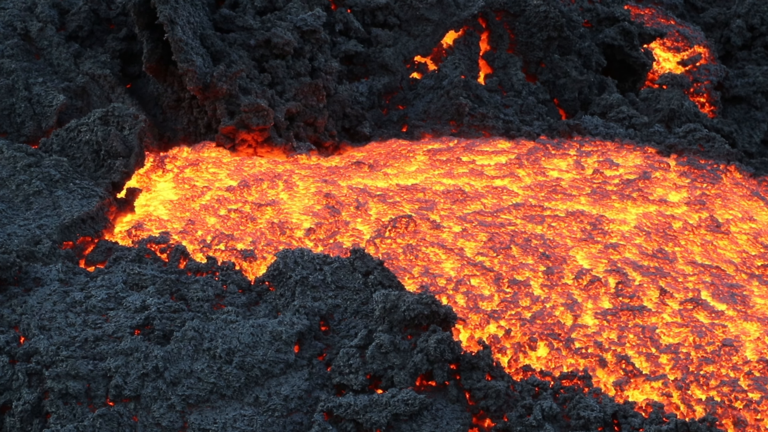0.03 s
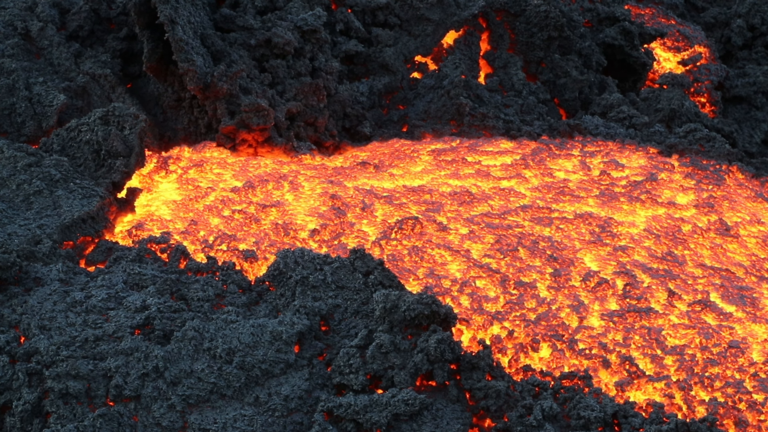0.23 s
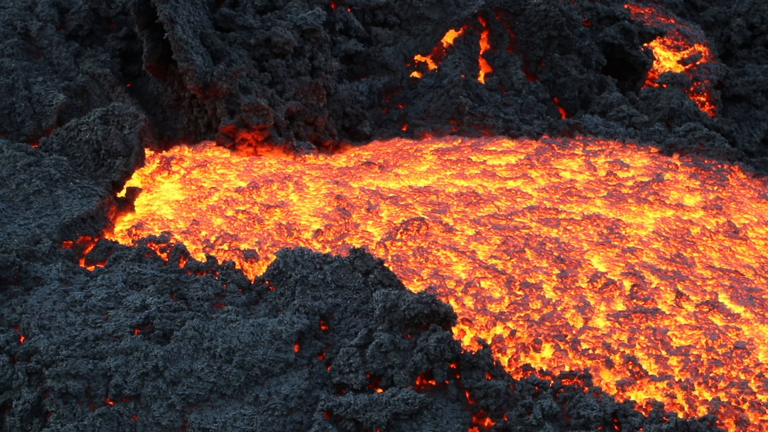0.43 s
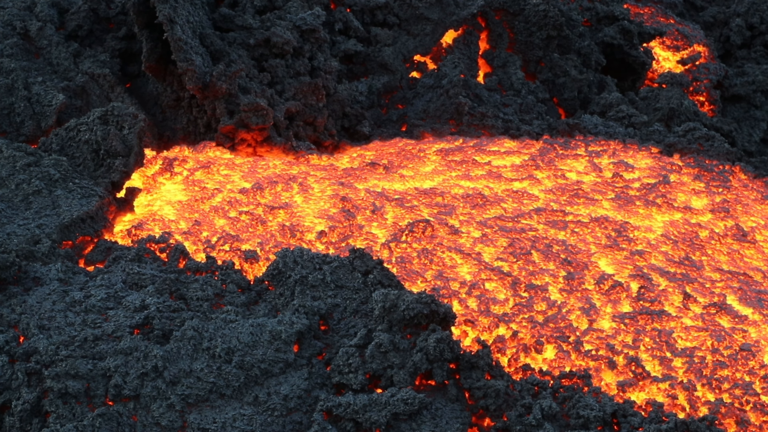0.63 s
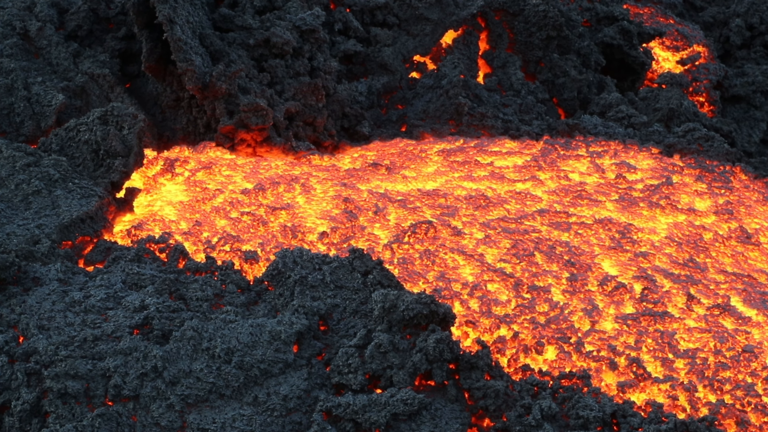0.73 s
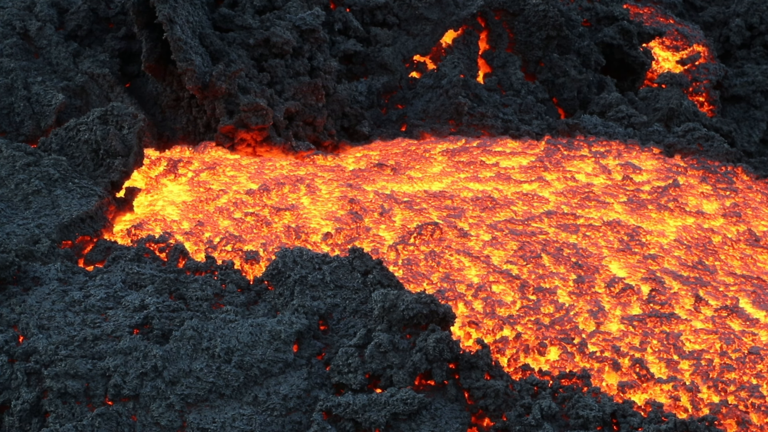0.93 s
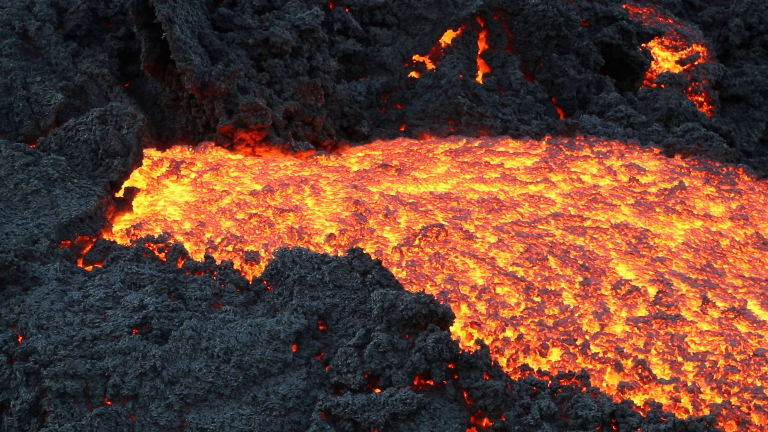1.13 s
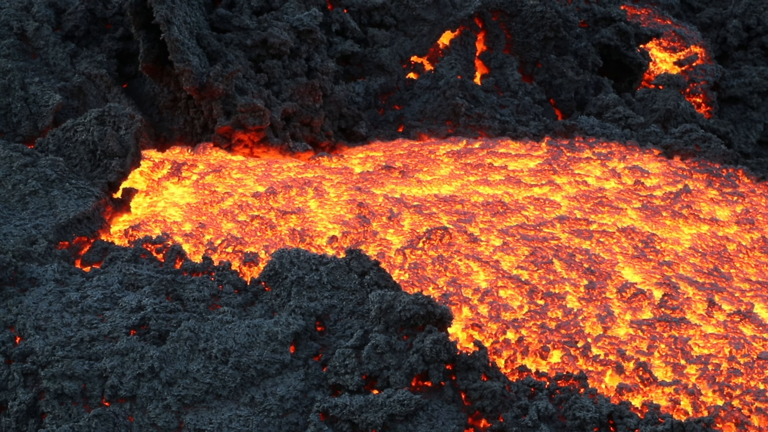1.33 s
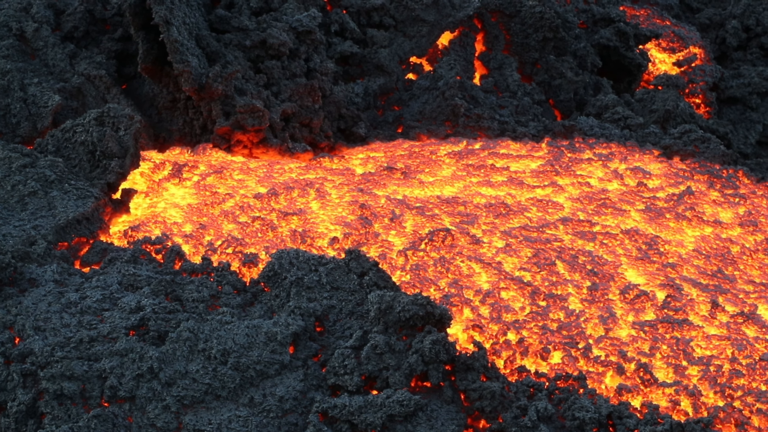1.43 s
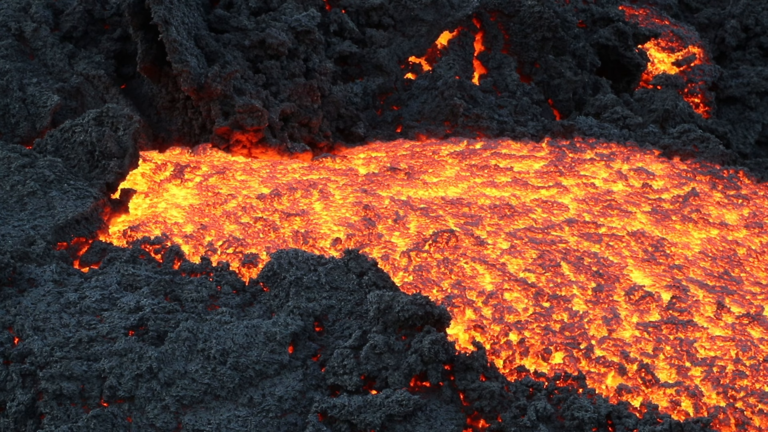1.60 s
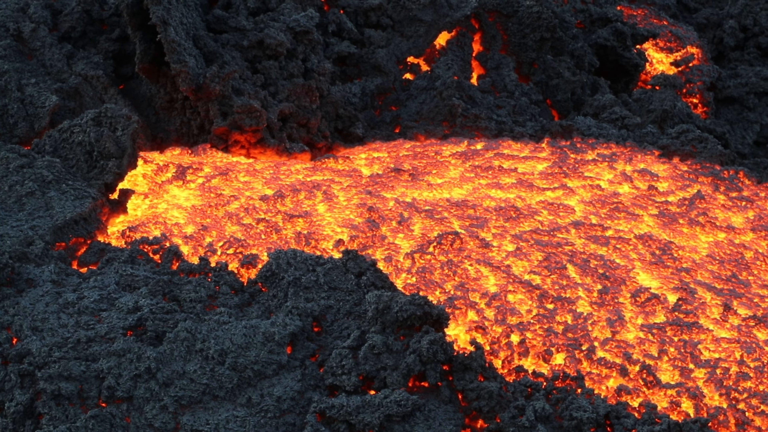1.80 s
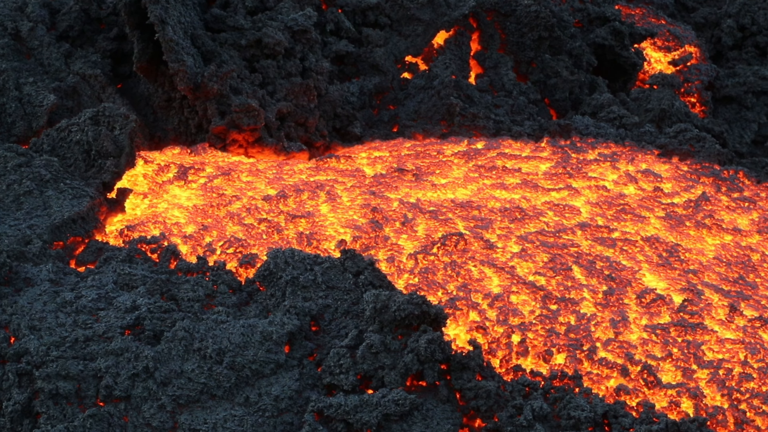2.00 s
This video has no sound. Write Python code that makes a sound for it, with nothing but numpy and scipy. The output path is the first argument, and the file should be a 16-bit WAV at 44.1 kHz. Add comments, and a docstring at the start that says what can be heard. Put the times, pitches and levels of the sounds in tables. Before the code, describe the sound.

Cooling lava crust crackles close by outdoors, with irregular dry snaps over dense, fine crackling throughout. Snaps cluster at 0-0.5 and 0.75-1.0 seconds, then thin out; a sharper one lands near 1.3. Small glassy clinks come at about 1.29 and 1.44, the second with a clear quick rebound. A soft dull rush continues behind. Deep wind buffets the microphone near 0.25, 1.5 and 1.9.

```python
"""The cooling crust of a slow lava flow snaps in tiny dry cracks, heard from close by, in the open.
Each crack is a brief wavelet; hundreds of smaller ones make a dense fine crackle beneath.
Twice something clinks, probably loose clinker: a few decaying modes with a softer rebound.
Rough rock gives these sounds a short noise tail. Behind them lie a soft rush of coloured noise
and the deep rumble of uneven gusts on the microphone, made of noise bands that swell separately."""
import sys
import numpy as np
from scipy import signal
from scipy.fft import rfft, irfft
from scipy.io import wavfile
from scipy.ndimage import uniform_filter1d

SR = 44100
rng = np.random.default_rng(int(sys.argv[2]) if len(sys.argv) > 2 else 0)


def to_wav(s):
    """Save 16-bit WAV."""
    ch = np.atleast_2d(s).T  # columns
    pcm = np.round(np.clip(ch, -1, 1) * 32767)  # PCM
    wavfile.write(sys.argv[1], SR, pcm.astype(np.int16))


N = 90493  # length in samples


def undb(db):
    """Decibels to gain."""
    return 10 ** (np.asarray(db) / 20)


def unit(x):
    """Scale to rms 1."""
    return x / np.sqrt(np.mean(x ** 2) + 1e-20)


def curve(table):
    """A level curve: (time, dB) points joined by straight lines."""
    time_s, level_db = np.array(table, float).T
    return np.interp(np.arange(N) / SR, time_s, level_db)


def colour(x, points):
    """Filter by (Hz, dB) points, falling 30 dB per octave past both ends."""
    hz, db = np.array(points, float).T
    corners = np.log2(hz)
    octave = np.log2(np.maximum(np.arange(N + 1) * SR / (2 * N), .5))
    octaves_outside = abs(octave - np.clip(octave, corners[0], corners[-1]))
    gain_db = np.interp(octave, corners, db) - 30 * octaves_outside
    return irfft(rfft(x, 2 * N) * undb(gain_db))[:N]


def noise(points):
    """Coloured noise of rms 1."""
    return unit(colour(rng.standard_normal(N), points))


def eddies(points, size):
    """Coloured turbulence whose strength is evened out over spans of size samples."""
    x = noise(points)
    power = abs(signal.hilbert(x)) ** 2 / 2
    smooth_power = uniform_filter1d(uniform_filter1d(power, size), size)
    return x / np.sqrt(smooth_power)


def add(out, start_s, sound):
    """Mix a sound in at its time."""
    i = int(np.clip(start_s * SR, 0, N - 1))
    out[i:i + len(sound)] += sound[:N - i]


def snap(hz, cycles):
    """A fracture: a wavelet that swells and dies within a few cycles, peaking at 1 or below."""
    turns = np.arange(SR // 150) / SR * min(hz, SR / 3)
    age = 2 * turns / cycles  # the envelope peaks at age 1
    envelope = (age * np.exp(1 - age)) ** 2
    return envelope * np.sin(2 * np.pi * (turns + rng.random()))


def rush():
    """Soft rush of the flow and the air: coloured noise on a slow level curve."""
    # colour of the rush: pitch_hz, density_db (dB per Hz)
    rush_colour = [(120, -13), (200, -2.5), (300, -1.5), (500, -2.5), (750, -6), (1150, -7.5),
                   (1600, -13.5), (2700, -18.5), (3700, -24.5), (4900, -23), (6200, -25), (15500, -42)]
    # level of the rush: time_s, level_db
    rush_level = [(0, -46.5), (.15, -51), (.4, -50.5), (.75, -54), (1.1, -53), (1.5, -53.5), (2.05, -54)]
    return noise(rush_colour) * undb(curve(rush_level))


def rumble():
    """Eddies of three sizes press on the microphone, over a slow heave of the air pressure."""
    # colours of the heave (mostly below hearing) and of the slow, middling and quick eddies:
    # pitch_hz, density_db (dB per Hz)
    heave_colour = [(2, -3), (5, -3.5), (10, -3), (15, -15), (22, -24.5), (40, -57)]
    deep_colour = [(18, -9), (24, 1.5), (28, -5), (33, -3.5), (40, -17.5), (60, -48)]
    bass_colour = [(32, -23), (46, -10), (57, 3.5), (68, -12), (80, -10), (110, -21), (150, -32.5)]
    flutter_colour = [(80, -25.5), (120, 3), (160, 0.5), (220, -9), (320, -24), (700, -48)]
    # gusting of each band: time_s, level_db (deep and flutter are trimmed below)
    heave_level = [(0, -20.5), (.25, -15.5), (.7, -18.5), (1.05, -22), (1.2, -6), (1.45, -13.5),
                   (1.6, -21.5), (1.83, -9.5), (2.05, -13.5)]
    deep_level = [(0, -52), (.17, -38), (.255, -11), (.34, -31.5), (.56, -20.5), (.66, -32), (.79, -34),
                  (.88, -23.5), (1.08, -33.5), (1.22, -23.5), (1.39, -34), (1.49, -9), (1.57, -16),
                  (1.68, -19.5), (1.76, -18.5), (1.84, -19.5), (1.905, -8), (1.98, -18.5), (2.05, -19)]
    bass_level = [(0, -32), (.2, -35.5), (.29, -26), (.4, -22.5), (.53, -43.5), (.8, -45), (.96, -37),
                  (1.07, -42.5), (1.18, -29), (1.3, -33.5), (1.37, -45), (1.52, -24), (1.6, -30.5),
                  (1.67, -37.5), (1.73, -29), (1.8, -33), (1.89, -28), (1.98, -31), (2.05, -38)]
    flutter_level = [(0, -51.5), (.17, -60), (.33, -43.5), (.41, -53), (.53, -58.5), (.75, -53), (.96, -53),
                     (1.06, -60.5), (1.16, -43), (1.24, -64), (1.3, -42.5), (1.37, -58), (1.55, -41),
                     (1.61, -48.5), (1.77, -52.5), (1.89, -42.5), (1.98, -56.5), (2.05, -35.5)]
    deep_trim_db, flutter_trim_db = -0.5, -2.5
    fade_s = .025

    heave = eddies(heave_colour, size=5000) * undb(curve(heave_level))
    deep = eddies(deep_colour, size=1600) * undb(curve(deep_level) + deep_trim_db)
    bass = eddies(bass_colour, size=1400) * undb(curve(bass_level))
    flutter = eddies(flutter_colour, size=1200) * undb(curve(flutter_level) + flutter_trim_db)

    # a short fade at both ends keeps the rumble from clicking
    t = np.arange(N) / SR
    to_nearest_end_s = np.minimum(t, t[-1] - t)
    fade = np.sin(np.pi / 2 * np.minimum(to_nearest_end_s / fade_s, 1))
    return fade * (heave + deep + bass + flutter)


def puff():
    """One quick eddy hits the microphone with a dull bump, shaped by a bell curve in time."""
    # colour of the puff: pitch_hz, density_db (dB per Hz)
    puff_colour = [(110, -0.5), (170, -7), (250, 3.5), (310, -11.5), (450, -19)]
    centre_s, level_db, width_s = 1.538, -40.5, 0.017
    t = np.arange(N) / SR
    bump = np.exp(-((t - centre_s) / width_s) ** 2)
    return eddies(puff_colour, size=800) * undb(level_db) * bump


def crackle():
    """Small flakes break off at random moments, with scattered pitches and strengths."""
    # flakes by size: pitch_hz, rate_per_s, level_db (rms before the curve below),
    # pitch_spread_octaves, ring_cycles
    flake_sizes = [(1320, 140, -64, 0.51, 1.77), (2590, 300, -63, 0.27, 2), (4830, 220, -65, 0.091, 3.3),
                   (7470, 220, -69.5, 0.33, 1.5)]
    # swelling and thinning of the whole crackle: time_s, gain_db
    crackle_level = [(0, -7), (.09, 3), (.2, -5), (.27, 3.5), (.4, -2), (.56, 1.5), (.66, 4), (.73, -3),
                     (.83, 5), (.95, 2), (1.01, -2), (1.17, -1.5), (1.27, -1.5), (1.37, -2.5), (1.55, -3.5),
                     (1.7, -2.5), (1.81, 1.5), (1.87, -4.5), (1.95, 3.5), (2.05, -7)]
    strength_spread_db = 5.5
    out = np.zeros(N)
    for hz, rate, db, octaves, cycles in flake_sizes:
        layer = np.zeros(N)
        for _ in range(int(rate * N / SR)):
            start_s = rng.random() * N / SR
            pitch_chance, strength_chance = rng.standard_normal(2)
            flake = snap(hz * 2 ** (octaves * pitch_chance), cycles)
            # the cap keeps rare flakes from sticking out
            add(layer, start_s, undb(strength_spread_db * min(strength_chance, 2)) * flake)
        out += undb(db) * unit(layer)
    return out * undb(curve(crackle_level))


def clinks():
    """Short glassy rings of decaying modes; a softer rebound stirs only the two lowest again."""
    # the clinks: start_s, level_db, pitch_ratio, rebound_db (relative to the clink)
    clink_events = [(1.287, -36, 1.02, -20), (1.4402, -35.5, .99, -4.5)]
    # modes they ring with: pitch_hz (before the ratio), level_db (within the clink), t60_s
    clink_modes = [(1232, 0.5, 0.029), (1308, -4.5, 0.055), (2210, -8.5, 0.031), (3390, -7, 0.018)]
    attack_s, rebound_delay_s = 0.0023, .0125
    out, t = np.zeros(N), np.arange(SR // 10) / SR
    attack = np.minimum(t / attack_s, 1)
    for start_s, db, ratio, rebound_db in clink_events:
        modes = []
        for hz, mode_db, t60_s in clink_modes:
            decay = np.exp(-np.log(1000) * t / t60_s)
            tone = np.sin(2 * np.pi * hz * ratio * t)
            modes.append(undb(mode_db) * attack * decay * tone)
        add(out, start_s, undb(db) * sum(modes))
        add(out, start_s + rebound_delay_s, undb(db + rebound_db) * sum(modes[:2]))
    return out


def cracks():
    """The louder snaps of the crust, from dry ticks to briefly ringing chips."""
    # the snaps: start_s, level_db (of the wavelet's envelope peak), pitch_hz, ring_cycles
    crack_events = [(0.02, -34, 4340, 1.5), (0.0786, -31, 2600, 0.39), (0.0996, -36.5, 5000, 2.5),
                    (0.1108, -28.5, 3100, 0.44), (0.1325, -42, 4900, 2.5), (0.1774, -34, 3690, 0.85),
                    (0.2526, -34, 4000, 1.0), (0.291, -43, 990, 3.8), (0.3034, -31, 2100, 0.56),
                    (0.3397, -30.5, 3800, 0.91), (0.3714, -31, 1500, 1.05), (0.3823, -27.5, 3290, 1.12),
                    (0.3977, -31.5, 3170, 0.89), (0.4255, -30.5, 2800, 1.3), (0.4626, -35, 3290, 1.3),
                    (0.5005, -42, 4800, 1.0), (0.5397, -34.5, 2540, 2.2), (0.6224, -40, 4120, 1),
                    (0.652, -31, 3690, 0.81), (0.6763, -28, 3100, 0.79), (0.7613, -31.5, 2940, 0.44),
                    (0.7957, -31, 2840, 0.39), (0.8085, -31, 4610, 0.64), (0.8478, -33, 1530, 0.94),
                    (0.8575, -30, 2730, 3.3), (0.885, -31, 2630, 0.5), (0.897, -29.5, 1820, 1.45),
                    (0.9206, -28.5, 5560, 1.8), (0.9386, -35, 3290, 0.7), (0.9585, -30.5, 3550, 0.82),
                    (0.971, -37.5, 2370, 1.2), (1.036, -38, 4570, 1.7), (1.1941, -36, 3480, 1.55),
                    (1.244, -37, 5230, 2.3), (1.264, -33, 4700, 1.6), (1.3017, -29.5, 2180, 0.56),
                    (1.307, -25, 3770, 0.51), (1.3756, -36.5, 6260, 1.7), (1.5279, -42, 4610, 2.8),
                    (1.5592, -29.5, 2630, 0.5), (1.5935, -38, 2920, 0.7), (1.611, -37.5, 4600, 4.2),
                    (1.6268, -35.5, 1400, 1.1), (1.6818, -31.5, 3230, 0.48), (1.7504, -44, 2730, 4),
                    (1.798, -30, 3100, 0.6), (1.8194, -38, 4700, 1.5), (1.91, -38, 2650, 1.4),
                    (1.9865, -38.5, 2750, 3.1), (2.025, -33.5, 1200, 0.48)]
    out = np.zeros(N)
    for start_s, db, hz, cycles in crack_events:
        add(out, start_s, undb(db) * snap(hz, cycles))
    return out


def rocks(x):
    """Rough rock scatters a short, faint tail: convolution with decaying noise."""
    t60_s, level_db = 0.04, -10
    t = np.arange(SR // 2) / SR
    tail = rng.standard_normal(len(t)) * np.exp(-np.log(1000) * t / t60_s)
    tail /= np.linalg.norm(tail)
    return x + undb(level_db) * signal.fftconvolve(x, tail)[:N]


def scene():
    """Rumble and rush under the sounds of the crust."""
    air = rush() + rumble() + puff()
    crust = crackle() + clinks() + cracks()
    return (air + rocks(crust))[None]


def record(dry):
    """The recorder dulls the treble, adds faint hiss and cuts the top."""
    # treble response: pitch_hz, gain_db
    treble = [(5400, 0), (6100, -5), (8700, 3.5), (9200, -11), (15500, -14.5)]
    hiss_db, top_hz = -70, 15800
    hz, db = np.array(treble, float).T
    grid_hz = np.linspace(0, SR / 2, 257)
    taps = signal.firwin2(257, grid_hz, undb(np.interp(grid_hz, hz, db)), fs=SR)
    # mirrored ends keep the filter from clicking at the edges
    padded = np.pad(dry[0], len(taps) // 2, "reflect", reflect_type="odd")
    dull = signal.fftconvolve(padded, taps, "valid")
    hiss = undb(hiss_db) * rng.standard_normal(N)
    top_cut = signal.ellip(8, .1, 60, top_hz, fs=SR, output="sos")
    return signal.sosfiltfilt(top_cut, dull + hiss)[None]


dry = scene()
out = record(dry)
to_wav(out)
```